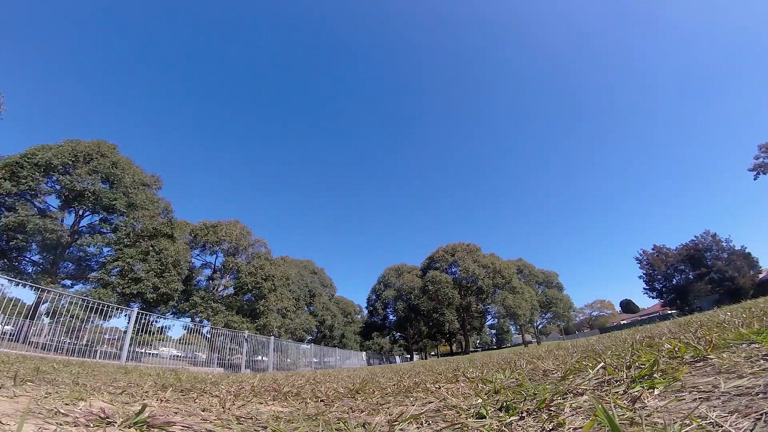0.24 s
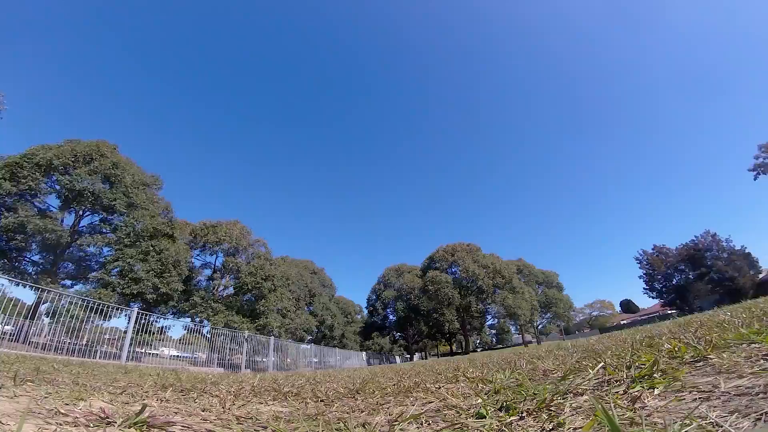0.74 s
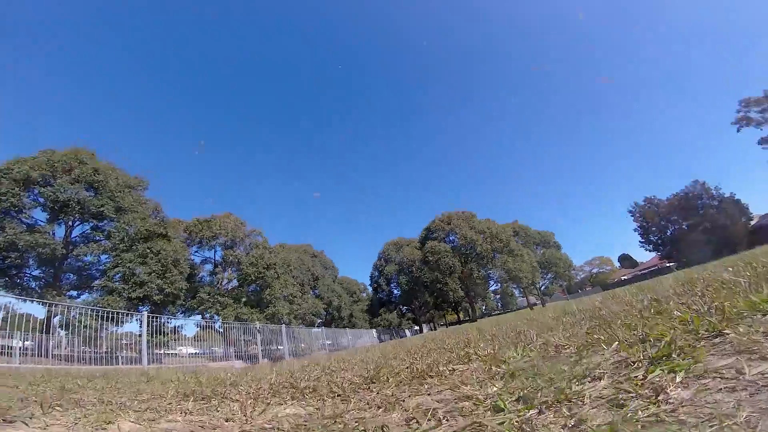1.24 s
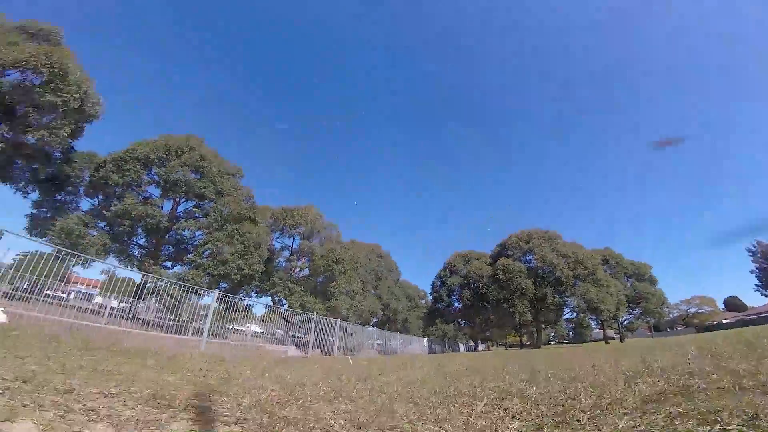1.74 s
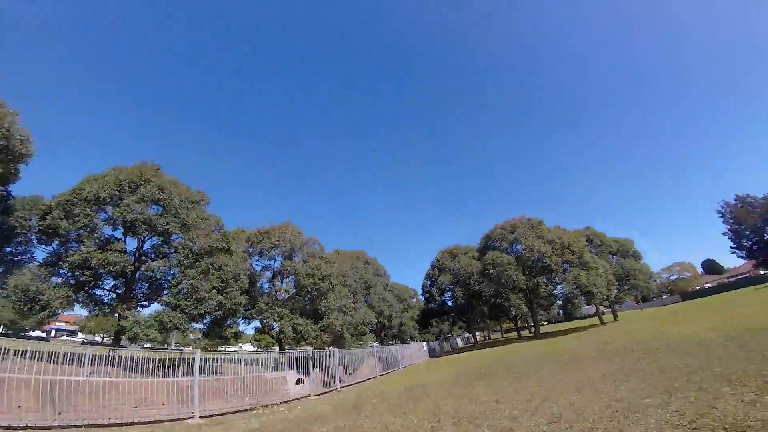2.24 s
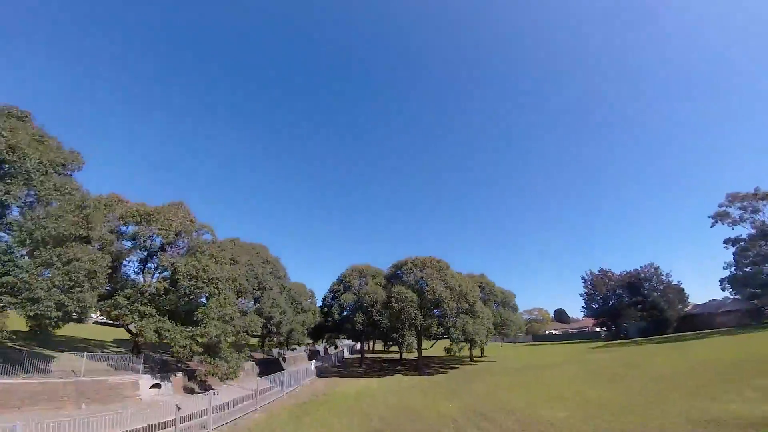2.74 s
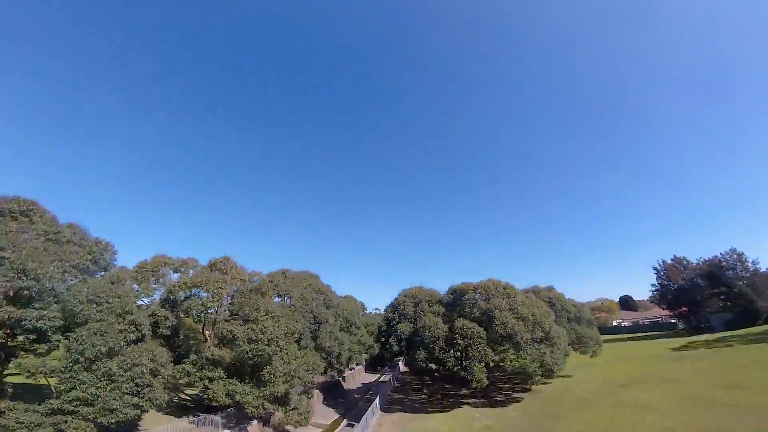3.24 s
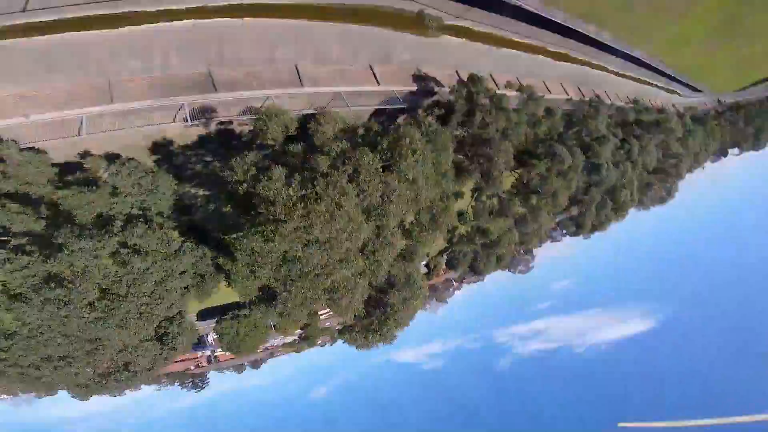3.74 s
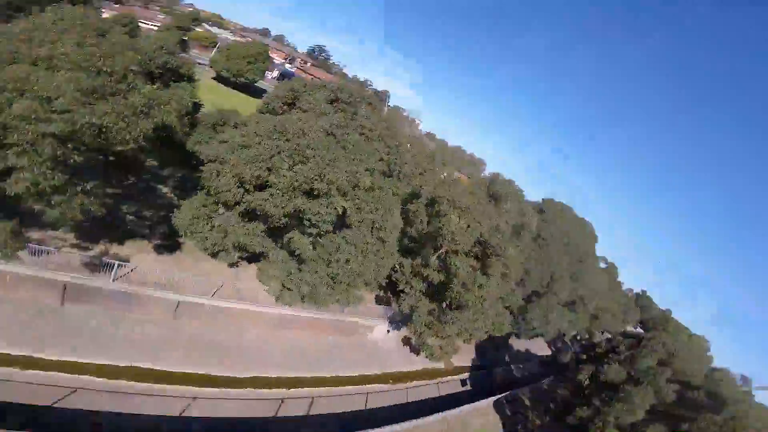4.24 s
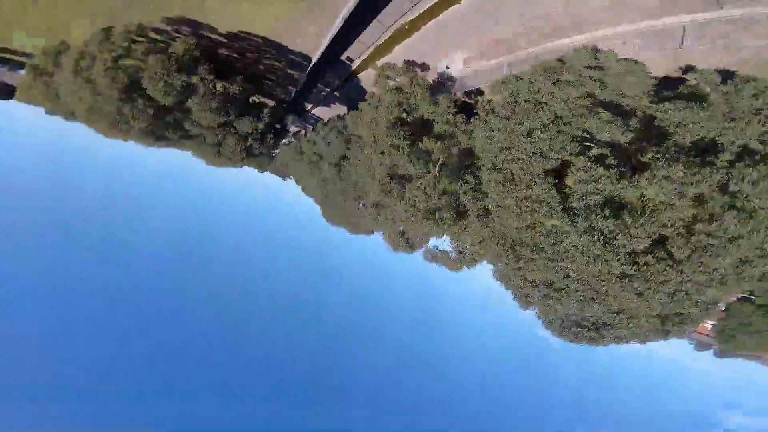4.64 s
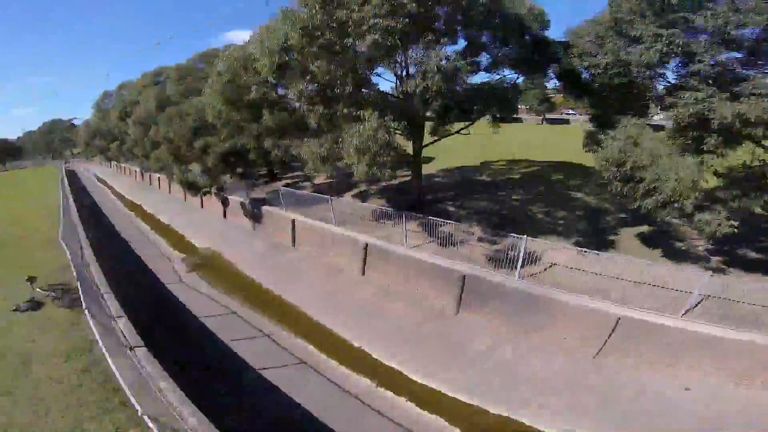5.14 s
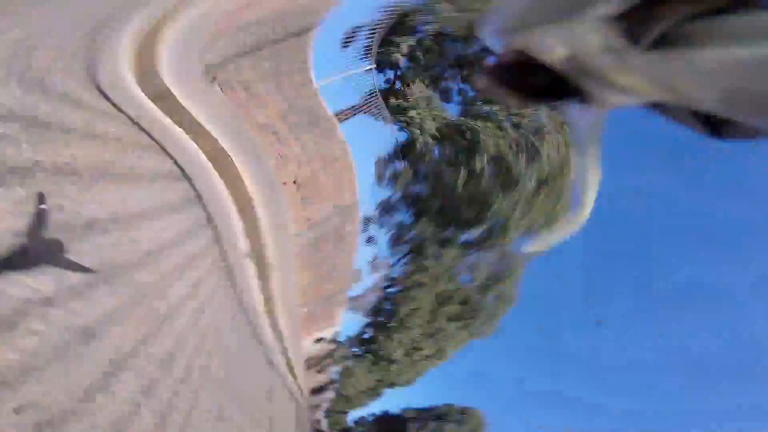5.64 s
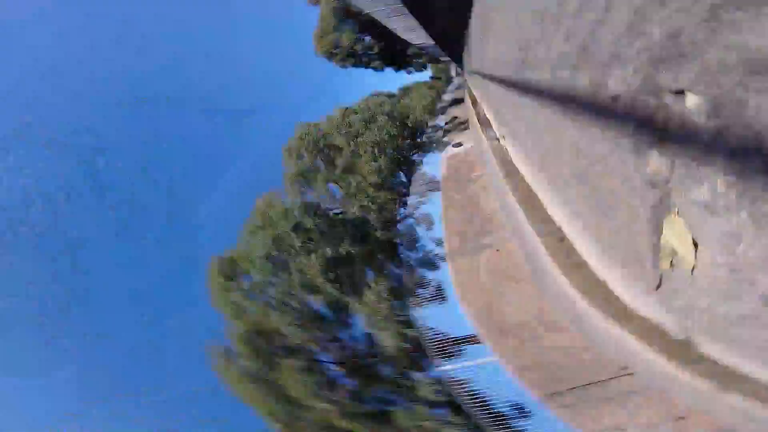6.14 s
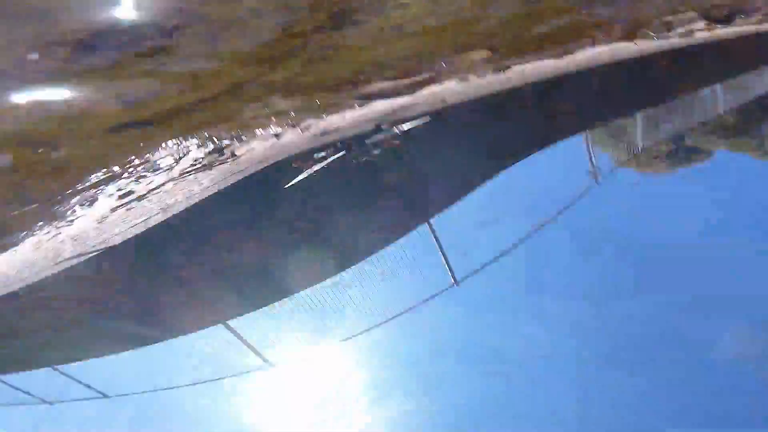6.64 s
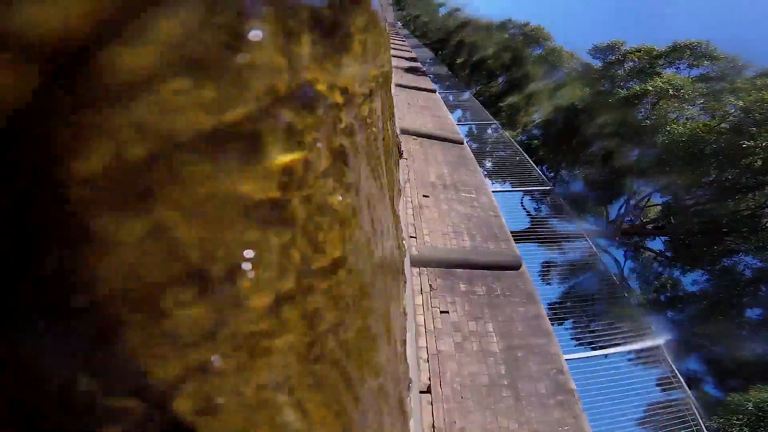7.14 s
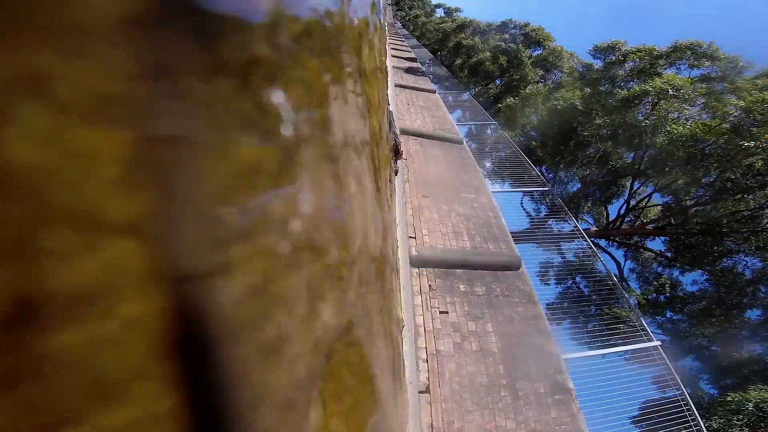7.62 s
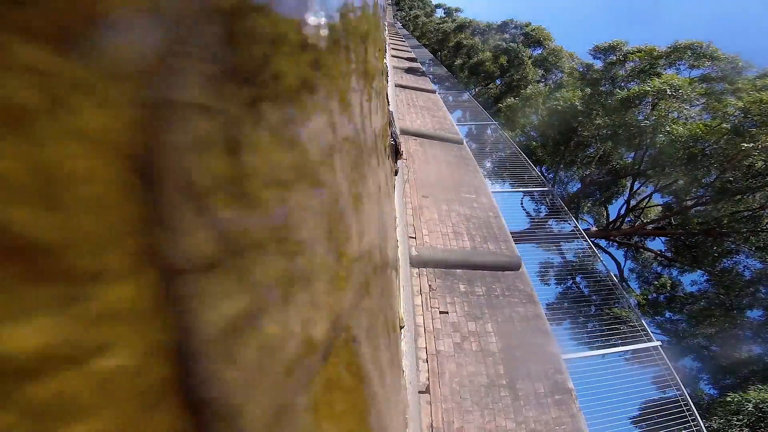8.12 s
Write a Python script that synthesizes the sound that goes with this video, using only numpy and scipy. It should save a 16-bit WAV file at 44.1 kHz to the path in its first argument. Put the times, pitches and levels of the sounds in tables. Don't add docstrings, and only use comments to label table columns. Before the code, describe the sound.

Heard from a microphone inside a camera housing on a small drone outdoors: uneven idling and gusty blade wash, then a loud climbing whine that slides and beats, with a harsh rattle. Motors cut, blades tick to a stop, faint birds chirp. Wind roars in the fall, then hard plastic knocks and scrapes on concrete, wet slaps, bubbles and drips.

```python
import sys
import numpy as np
from scipy import signal
from scipy.io import wavfile
from scipy.ndimage import uniform_filter1d

SR = 44100
rng = np.random.default_rng(int(sys.argv[2]) if len(sys.argv) > 2 else 0)


def bounce(signal):
    frames = np.transpose(np.atleast_2d(signal))
    limited = np.clip(frames, -1, 1)
    pcm = np.round(limited * 32767).astype(np.int16)
    wavfile.write(sys.argv[1], SR, pcm)


def makeup_ratio(level_db):
    decades = np.asarray(level_db, float) / 20
    return 10 ** decades


N = 369558


def evened(x):
    return x / np.sqrt(np.mean(x ** 2) + 1e-20)


def noise(size):
    return rng.standard_normal(size)


def add(mix, start_s, sound):
    part = mix[round(start_s * SR):][:len(sound)]
    part += sound[:len(part)]


def add_rows(mix, make, table, *settings):
    for row in table:
        add(mix, *make(*row, *settings))


def columns(rows):
    times_s, *rest = np.transpose(rows)
    t = np.arange(times_s[0], times_s[-1], 1 / SR)
    return times_s[0], [np.interp(t, times_s, column) for column in rest]


def wander(size, hz):
    lowpass = signal.butter(2, hz, fs=SR, output="sos")
    return evened(signal.sosfilt(lowpass, noise(size + 4000))[4000:])


def angle(hz):
    return 2 * np.pi * (np.cumsum(hz) / SR + rng.random())


def band(x, low_hz, high_hz):
    return signal.sosfilt(signal.butter(3, [low_hz, high_hz], "band", fs=SR, output="sos"), x)


def resonate(x, hz, width_hz):
    turn = np.exp(1j * angle(hz * np.ones(len(x))))
    r = np.exp(-np.pi * width_hz / SR)
    return 2 * (turn * signal.lfilter([1 - r], [1, -r], x / turn)).real


def faded(x, fade_s):
    return x * signal.windows.tukey(len(x), min(1, 2 * fade_s * SR / len(x)))


def capsule_hiss():
    return makeup_ratio(-84 + 3.5 * wander(N, 2.5)) * evened(band(noise(N), 5100, 7800))


CROSSOVER_HZ = [130, 900, 3600]
# pitch_hz, density_db [dB per Hz]
IDLE_COLOUR = [(20, -2), (208, 4), (631, 0), (954, -23), (2360, -36), (7350, -38), (12000, -72),
               (17000, -115)]
CLIMB_COLOUR = [(20, -20), (65, 4), (113, -11.5), (552, -13.5), (1410, -22.5), (6530, -29.5), (9390, -40.5),
                (11500, -73.5)]
FALL_COLOUR = [(20, 7.5), (81, -6.5), (246, -1), (881, -16.5), (2990, -31.5), (5400, -54.5), (6530, -47),
               (13000, -104)]
REST_COLOUR = [(20, -2.5), (54, 3.5), (358, -21), (1110, -47), (3750, -64.5), (6620, -45.5), (12000, -61),
               (17000, -99.5)]
# time_s, strength_db, bite_db [roar over wash]
WAKE = [(0.0, -49, -6), (0.034, -58, 2), (0.085, -51, -9), (0.087, -42, 7.5), (0.145, -52, -3)]
IDLE = [(0.145, -33, -0.5), (0.175, -39, 4), (0.19, -21.5, -18), (0.212, -26.5, -9.5), (0.228, -15, -15),
        (0.258, -15.5, -17), (0.275, -26.5, -9.5), (0.36, -30, -11.5), (0.44, -32, -9), (0.48, -23, -13),
        (0.56, -30, -10), (0.68, -26, -8.5), (0.922, -21.5, -11), (1.074, -28.5, -6.5),
        (1.114, -20.5, -6.5), (1.128, -28.5, 1.5), (1.135, -42.5, -3.5), (1.15, -41, 12)]
CLIMB = [(1.15, -28, -18), (1.194, -23.5, -13.5), (1.66, -22.5, -12), (2.036, -33, 7.5), (2.12, -31, 8.5),
         (2.606, -35.5, 8), (2.886, -37.5, 3), (3.404, -37.5, 10.5), (3.42, -46.5, -1)]
COAST = [(3.42, -28.5, -1), (3.442, -35, 1), (3.47, -39.5, -5), (3.69, -35, -7.5), (3.712, -28, -2),
         (3.745, -26.5, -4.5), (3.8, -46, -23), (4.02, -60.5, -5.5), (4.22, -48.5, -11.5),
         (4.69, -43, -18.5), (4.715, -30.5, -27), (4.78, -36, -22.5)]
DIVE = [(4.77, -36, -21), (4.80, -32, -7.5), (4.842, -34.5, 7.5), (4.852, -35.5, -25), (4.888, -34.5, -18),
        (4.9, -30, -14), (4.93, -26.5, -25), (5.0, -30.5, -23), (5.038, -33, -24), (5.048, -21, -36.5),
        (5.09, -17.5, -19.5), (5.125, -19, -25), (5.154, -15.5, -11.5), (5.255, -20.5, -10.5),
        (5.29, -19.5, -20), (5.35, -27, -4.5), (5.53, -27.5, -0.5), (5.643, -21.5, -20)]
REST = [(5.64, -65.5, -3), (5.82, -52.5, -17.5), (6.62, -72.5, 1), (6.92, -67, -4), (7.13, -52.5, -18),
        (7.3, -62, -5.5), (8.38, -56, -6)]
# time_s, strength_db, bite_db
RUSH = [
    (5.15, -80.5, 0.0045),
    (5.53, -48, 0),
    (5.643, -74, 0.0068),
]


def air(rows, colour, buffet_db, hiss_db, hiss_bite, gust_db, patchy_db):
    start_s, (wash, bite) = columns(rows)
    buffet = buffet_db + 0.49 * wash - 0.43 * bite
    levels_db = [buffet, wash, wash + bite, hiss_db + wash + hiss_bite * bite]
    size = len(wash)
    hz = np.fft.rfftfreq(1024, 1 / SR)
    real, imag, patches = rng.standard_normal((size // 256 + 6, 513, 3)).T
    patches = uniform_filter1d(patches, size=10, axis=0)
    patches = evened(uniform_filter1d(patches, size=6, axis=1))
    colour_hz, colour_db = np.transpose(colour)
    tilt_db = np.interp(np.log(hz + 1), np.log(colour_hz), colour_db, right=-120)
    spectrum = (real + 1j * imag) * makeup_ratio(tilt_db[:, None] + patchy_db * patches)
    above = [1 / (1 + (c / (hz + 1)) ** 8) for c in CROSSOVER_HZ]
    above = [np.ones(513)] + above + [np.zeros(513)]
    gusts = wander(size, 50)
    gusts = makeup_ratio(gust_db * evened(gusts - uniform_filter1d(gusts, size=5000)))
    out = np.zeros(size)
    for k, level_db in enumerate(levels_db):
        share = np.sqrt(np.maximum(above[k] - above[k + 1], 0))[:, None]
        layer = signal.istft(spectrum * share, nperseg=1024, noverlap=768)[1][:size]
        out += makeup_ratio(uniform_filter1d(level_db, size=250)) * evened(gusts * layer)
    return start_s, faded(out, 0.0018)


# start_s, length_s, pitch_hz, width_hz, level_db
WHISTLES = [(.15, .98, 7300, 110, -55), (2.75, .6, 6200, 1400, -42), (1.17, .8, 9800, 1300, -58),
            (1.9, .8, 2600, 900, -38), (3.42, .37, 2300, 1600, -47), (1.3, .5, 1820, 200, -42),
            (.093, .07, 6020, 40, -47), (1.17, 1.1, 6500, 400, -46), (1.17, .9, 4900, 400, -47),
            (5.92, .2, 6900, 900, -78), (4.45, .6, 6600, 600, -84), (4.65, .4, 6600, 600, -80),
            (5.08, .03, 4000, 2000, -54), (5.15, .25, 3800, 2500, -51), (2.15, .45, 390, 110, -29),
            (.984, .016, 620, 250, -21), (6.62, .08, 1700, 500, -66), (5.4, .2, 2700, 700, -38),
            (8.05, .33, 6600, 900, -82), (1.17, .6, 11300, 700, -66), (7.39, .035, 2100, 350, -62),
            (3.43, .02, 520, 120, -28), (7.05, .13, 2300, 1100, -63), (7.18, .3, 1900, 1400, -69),
            (6.99, .03, 1400, 1500, -39), (7.02, .045, 1700, 1300, -53), (6.745, .08, 850, 150, -62)]


def whistle(start_s, length_s, hz, width_hz, level_db):
    size = round(length_s * SR)
    sound = noise(size) * makeup_ratio(3 * wander(size, 30))
    for width in (width_hz, width_hz, 2 * width_hz):
        sound = resonate(sound, hz, width)
    return start_s, faded(makeup_ratio(level_db) * evened(sound), 0.0033)


# start_s, length_s, pops_per_s, level_db
CRACKLE = [(7.47, 0.24, 840, -63.5)]


def crackle(start_s, length_s, pops_per_s, level_db):
    chance, size = rng.random((round(length_s * SR), 2)).T
    pops = (chance < pops_per_s / SR) * makeup_ratio(24.0 * size ** 2)
    return start_s, makeup_ratio(level_db) * evened(band(pops, 900, 4200))


# start_s, length_s, from_hz, to_hz, level_db
CHIRPS = [
    (4.02, .035, 2700, 3850, -63),
    (4.135, .04, 2700, 3350, -62),
    (4.235, .045, 2300, 3250, -61),
    (4.355, .04, 2200, 3200, -58),
    (4.465, .04, 2400, 3100, -62),
    (4.833, 0.0086, 895, 960, -13),
    (1.19, .1, 1150, 1380, -32),
    (6.978, 0.091, 59.4, 36.3, -13),
    (6.995, .07, 150, 105, -24),
]


def chirp(start_s, length_s, from_hz, to_hz, level_db):
    u = np.arange(round(length_s * SR)) / (length_s * SR)
    hz = from_hz + (to_hz - from_hz) * np.sin(1.6 * u)
    return start_s, makeup_ratio(level_db) * np.sin(np.pi * u * np.sqrt(u)) * np.sin(angle(hz))


# start_s, length_s, pitch_hz, level_db
WARBLE = [(.32, .8, 2450, -49), (.65, .47, 3250, -48)]


def warble(start_s, length_s, hz, level_db):
    size = round(length_s * SR)
    wobble = .07 * np.sin(angle(28 + 4. * wander(size, 8)))
    tone = np.sin(angle(hz * (1 + wobble)))
    return start_s, faded(makeup_ratio(level_db + 2.5 * wander(size, 25)) * tone, 0.019)


# start_s, peak_db, pitch_hz
TICKS = [(3.6172, -48, 2400), (3.6473, -32, 2170), (3.6644, -32, 1800), (3.683, -36, 2000),
         (3.709, -33, 1810), (3.721, -42, 2400), (3.7354, -38, 1600), (3.7547, -43, 2380),
         (3.7774, -46, 2220), (3.7894, -45, 1990)]
DRIPS = [(6.9174, -38, 1610), (6.9805, -29, 1400), (7.0394, -37, 1840), (7.0474, -34, 1590),
         (7.0794, -40, 1200), (7.1114, -44, 1560), (7.1224, -44, 929), (7.2514, -49, 897),
         (7.4315, -37.5, 1876), (7.4799, -41, 2010), (7.4939, -33, 1790), (7.5073, -28.5, 1750),
         (7.5194, -35, 1480), (7.5492, -34, 1350), (7.5712, -43, 1300), (7.5926, -48, 1210),
         (7.6136, -35, 1210), (7.6214, -38, 1380), (7.6304, -40, 1095), (7.6434, -48, 1340),
         (7.6655, -37, 1470), (7.6774, -37, 1560), (7.687, -13, 3000), (7.7472, -18, 4200),
         (6.472, -50, 900), (6.848, -47, 2180)]


def tick(start_s, peak_db, hz, decay_s):
    t = np.arange(900) / SR
    snap = band(noise(len(t)) * np.exp(-t / decay_s), .12 * hz, 1.7 * hz)
    return start_s, makeup_ratio(peak_db) * snap / np.abs(snap).max()


# start_s, peak_db, pitch_hz
PINGS = [(2.1402, -28, 5590), (2.1572, -22.5, 5460), (2.1881, -25, 6200), (2.2186, -27, 5700),
         (2.234, -21, 5130), (2.253, -23, 5500), (2.301, -24, 5730), (2.3158, -19.5, 5400),
         (2.3922, -25, 5240), (2.4241, -21.5, 5500), (2.4934, -24, 5310), (2.5827, -24, 5260),
         (2.597, -28, 5100), (2.2111, -13.5, 1560), (2.2645, -10.5, 2700), (2.2665, -11, 1850),
         (2.3667, -13.5, 1810), (2.4316, -17.5, 2300), (3.3141, -37, 8400)]
BUBBLES = [(6.991, -19.5, 484), (6.996, -27, 1880), (7.008, -30, 1053), (7.033, -27.5, 1800),
           (7.15, -50, 520)]


def ping(start_s, peak_db, hz, ring_s):
    t = np.arange(2600) / SR
    u = t / ring_s * np.sqrt(hz / 1000)
    rough = np.sin(angle(hz * (1 + .05 * wander(len(t), 250))))
    rough = rough + .5 * np.sin(angle(1.13 * hz + 0 * t))
    return start_s, makeup_ratio(peak_db) * u * np.exp(1 - u) * rough / 1.1


# start_s, length_s, rumble_db, rasp_db, rasp_hz
SCRAPES = [(5.701, 0.044, -11, -39.5, 4970), (5.89, 0.031, -20, -50, 3000), (6.227, 0.041, -21, -43, 5900),
           (6.301, 0.053, -34, -48, 4460), (6.516, 0.091, -78, -60.5, 3970),
           (6.562, 0.046, -58, -48.5, 3210), (6.584, 0.049, -57, -44.5, 3040),
           (6.603, 0.13, -46.5, -72, 1500), (6.732, 0.066, -72, -46, 2710), (6.851, 0.17, -52, -57.5, 2530),
           (6.947, 0.028, -26, -47, 2320), (6.986, 0.054, -27, -55, 1900), (7.194, 0.021, -35, -68, 1500)]


def scrape(start_s, length_s, rumble_db, rasp_db, rasp_hz):
    size = round(1.3 * length_s * SR)
    grit = noise(size) * makeup_ratio(3.6 * wander(size, 150))
    port = (rasp_hz / 5500) ** 2 * resonate(grit, 7200, 800)
    rasp = evened(band(grit, 0.42 * rasp_hz, 1.38 * rasp_hz) + port)
    rumble = wander(size, 190)
    sound = makeup_ratio(rumble_db) * rumble + makeup_ratio(rasp_db) * rasp
    return start_s, faded(sound * np.geomspace(1.9, .07, size), 0.003)


# start_s, crack_db, thump_hz, thump_db, knock_db
BUMPS = [(0.0914, -14.5, 54, -18.5, -50), (0.1452, -20, 80.7, -50, -30), (0.1876, -22, 330, -17.5, -49),
         (0.225, -27, 180, -8.5, -31), (4.272, -68, 220, -41, -51), (4.333, -68, 258, -40.5, -38),
         (5.0927, -50, 150, -8.5, -26), (4.9032, -52, 420, -18, -33), (5.031, -39, 96, -17, -47),
         (3.915, -74, 79, -31.5, -64)]
BOUNCES = [(5.7038, 1, 94.2, -8.5, 4.5), (5.7261, -21.5, 79.5, -14, -34), (5.766, -35, 93, -20.5, -41),
           (5.7988, -41.5, 250, -34.5, -35.5), (5.896, -38, 80, -25.5, -29),
           (5.9043, -53, 110.2, -9.5, -50), (6.2445, -41, 167.7, -14.5, -47),
           (6.2514, -20.5, 89.5, -5.5, -27), (6.3012, -44, 215, -17, -45), (6.343, -40, 81, -51, -38),
           (6.412, -31, 123, -13.5, -19.5), (6.4255, -34.5, 485, -7.5, -24), (6.4388, -38, 77, -25.5, -38)]
SLAPS = [(6.7355, -18.5, 170, -3.5, -5.5), (6.865, -26, 142, -4.5, -3.5), (6.8319, -42, 79.5, -31, -37),
         (6.9056, -35, 80.7, -28, -31), (6.9535, -39, 154, -15, -23), (6.9586, -39, 450, -19, -12.5),
         (6.995, -49, 78, -10.5, -12.5), (7.032, -50, 199, -45, -32), (7.047, -51, 79, -36, -48),
         (7.1024, -48, 104, -33.5, -41), (7.204, -47, 80, -24, -55), (7.6873, -36, 240, -16.5, -6.5)]
STOPS = [(6.119, -29, 78.3, -16, -23), (6.323, -19, 97, -7.5, -20.5), (7.307, -60.5, 79, -23.5, -31.5)]
DAMPING = [1.5, 1.53, 1.94, 5]


def blow(start_s, crack_db, thump_hz, thump_db, knock_db, damping_per_cycle):
    t = np.arange(2600) / SR
    swing = np.sin(2 * np.pi * thump_hz * t / (1 + 25 * t) + 1.0)
    push = swing * np.exp(-damping_per_cycle * thump_hz * t) * (1 - np.exp(-t / 0.0003))
    knock = band(noise(len(t)) * np.exp(-t / 0.00076), 480, 1940)
    crack_decay = np.exp(-t / 0.0016) + 0.071 * np.exp(-t / 0.0026)
    crack = band(noise(len(t)) * crack_decay, 1700, 6500)
    crack = crack + 9.5 * resonate(crack, 6600, 610)
    parts = ((thump_db + 4.0, push), (knock_db, knock), (crack_db - 4.5, crack))
    return start_s, sum(makeup_ratio(peak_db) * p / np.abs(p).max() for peak_db, p in parts)


# time_s, pitch_hz, level_db
SWAY = [(1.18, 73, -35.5), (1.294, 82.9, -30), (1.784, 70.5, -37.5), (2.162, 69.8, -31.5),
        (2.72, 57.8, -34)]


def sway():
    start_s, (hz, level_db) = columns(SWAY)
    unsteady = makeup_ratio(level_db + 4.9 * wander(len(hz), 16))
    return start_s, faded(np.sqrt(2) * unsteady * np.sin(angle(hz)), 0.017)


# time_s, mean_hz, level_db
SHAFTS = [
    [(1.17, 210.6, -4), (1.242, 229.6, -14), (1.4, 194, -20.5)],
    [(1.45, 143.4, -30), (1.63, 201.9, -14.5), (1.796, 218.1, -12.5), (2.07, 178, -23),
     (2.18, 263.6, -15.5), (2.242, 243.8, -19), (2.56, 231.6, -18.5), (2.71, 198.3, -24.5)],
    [(2.73, 213.8, -18), (2.858, 245.9, -26), (3.062, 253.6, -23), (3.36, 221.8, -24.5), (3.45, 215.2, -30)],
]


def shafts(rows, spread_hz):
    start_s, (hz, level_db) = columns(rows)
    tone = 0
    turns = []
    for offset, gain_db in ((-0.35, 4.8), (0.6, 5.5), (0.17, 5.2)):
        a = angle(hz + offset * spread_hz + 3.7 * wander(len(hz), 11.0))
        turns.append(a)
        orders = np.sin(a) + .25 * np.sin(2 * a) + .14 * np.sin(3 * a) + .07 * np.sin(6 * a)
        tone = tone + makeup_ratio(gain_db) * orders
    swell = makeup_ratio(2.5 * np.sin(2.3 * turns[0] / 20))
    return start_s, faded(makeup_ratio(level_db) * evened(tone * swell), 0.055)


# time_s, shaft_hz, level_db, ring_hz, width_hz
RATTLE = [
    [(2.737, 285, -34.5, 2570, 110), (2.748, 284.3, -5, 2500, 110), (2.768, 272, -17, 2440, 130),
     (2.79, 286, -13, 2550, 110), (2.822, 288, -11, 2660, 110), (2.852, 255, -18.5, 2400, 150)],
    [(2.846, 261, -24, 2320, 148), (2.875, 261, -12, 2400, 258), (2.91, 271.4, -17, 2400, 120),
     (2.942, 262, -16.5, 2370, 160), (2.978, 265, -9.5, 2360, 333), (3.008, 266, -19.5, 2360, 197),
     (3.07, 261, -15.5, 2350, 220), (3.09, 262, -15.5, 2310, 180)],
    [(3.084, 255.3, -16.5, 2310, 180), (3.11, 251.8, -15, 2340, 230), (3.138, 248, -17.5, 2260, 168),
     (3.166, 253.4, -12, 2210, 272), (3.186, 239, -23, 2230, 200), (3.212, 239.7, -11.5, 2090, 200),
     (3.244, 219.3, -14.5, 1950, 200)],
    [(3.236, 246, -12, 1830, 201), (3.256, 242.6, -18.5, 1840, 200), (3.292, 242, -12, 1847, 201),
     (3.302, 233.6, -23, 1820, 200), (3.32, 238, -11.5, 1770, 200), (3.348, 228.5, -26.5, 1760, 200)],
    [(3.358, 256.3, -36, 1950, 201), (3.372, 239.2, -7.5, 1920, 200), (3.386, 231.5, -26.5, 1840, 200),
     (3.4, 232, -12.5, 1860, 200), (3.415, 228.6, -66, 1830, 200)],
]


def rattle(rows):
    start_s, (hz, level_db, ring_hz, width_hz) = columns(rows)
    size = len(hz)
    turn = angle(hz * (1 + 0.004 * wander(size, 56)))
    reach = []
    for k in range(4, 14):
        peak = np.exp(-((k * hz - ring_hz) / width_hz) ** 2)
        skirt = np.exp(-((k * hz - ring_hz + 150) / 750) ** 2)
        reach.append(peak + 0.2 * skirt)
    reach = reach / np.linalg.norm(reach, axis=0)
    strikes = evened(sum(g * np.cos(k * turn + .04 * k * k) for k, g in enumerate(reach, start=4)))
    buzz = evened(resonate(resonate(noise(size), ring_hz, 640), ring_hz, 300))
    third = np.cos(27 * turn) * np.clip((hz - 235) / 20, 0, 1) * np.clip((275 - hz) / 10, 0, 1)
    high = sum(makeup_ratio(3 * wander(size, 40)) * np.cos(k * turn + k * k) for k in range(18, 22))
    high = high + evened(band(noise(size), 4500, 5900))
    high_gain = makeup_ratio(.3 * level_db - 34) * np.clip((ring_hz - 1900) / 400, .25, 1)
    high = high_gain * (high + .7 * third)
    overtones = makeup_ratio(-19) * (hz < 254) * np.cos(1.6 * turn) + makeup_ratio(-24) * np.cos(2 * turn)
    flutter_db = 1.3 * wander(size, 32)
    sound = makeup_ratio(level_db + flutter_db) * (strikes + .42 * buzz + overtones) + high
    return start_s, faded(sound, 0.005)


# time_s, pitch_hz, level_db
ROTOR_A = [(1.22, 263, -21), (1.3, 509, -17.5), (1.34, 565, -18), (1.362, 564, -16.5), (1.394, 562, -14.5),
           (1.422, 517.4, -15.5), (1.54, 371, -21), (1.68, 222.6, -30)]
ROTOR_B = [(1.22, 255, -27), (1.36, 338, -24), (1.538, 490, -22), (1.62, 595, -18), (1.746, 628, -22.5),
           (1.86, 608, -23), (1.93, 550, -27), (1.978, 520, -35), (2.11, 480, -36), (2.14, 500, -21),
           (2.258, 640, -24.5), (2.37, 676, -22), (2.55, 664, -21), (2.635, 545, -21), (2.69, 565, -22),
           (2.73, 720, -27)]
ROTOR_C = [(1.72, 225.6, -35), (1.876, 512.5, -16), (2.012, 602, -16.5), (2.084, 564.5, -13.5),
           (2.15, 390, -24)]
ROTOR_D = [(2.715, 707, -35), (2.74, 742, -19.5), (2.764, 629, -28), (2.812, 748, -25), (2.858, 774.4, -25),
           (3.096, 760, -24.5), (3.28, 719, -31), (3.4, 664, -30), (3.42, 630, -34.5)]
ROTOR_E = [(2.13, 600, -36), (2.18, 735, -27), (2.23, 770, -27), (2.3, 640, -33), (2.42, 590, -29),
           (2.55, 560, -30), (2.68, 480, -36)]
# pitch_hz, width_hz, pole_order [of the blade rate]
BELL = (7860, 260, 14)


def blade_overtones(a):
    return np.sin(2 * a) + .45 * np.sin(3 * a) + .15 * np.sin(4 * a)


def rotor(rows, fine_db, octave_db, bell_db, near_db):
    start_s, (hz, level_db) = columns(rows)
    size = len(hz)
    turn = angle(hz * (1 + .007 * wander(size, 40)))
    bell_hz, width_hz, order = BELL
    bell = makeup_ratio(bell_db) * np.exp(-((order * hz - bell_hz) / width_hz) ** 2)
    bell = bell * (1 + 0.7 * np.cos(turn / 3))
    tone = np.sin(turn) + makeup_ratio(octave_db) * blade_overtones(turn) + bell * np.sin(order * turn)
    fine = sum((4 / k) ** 1.5 * np.sin(k * turn / 3 + k * k) for k in range(4, 14) if k % 3)
    tone += makeup_ratio(fine_db + 1.9 * wander(size, 25)) * fine
    near = angle(hz * (1.05 + 0.044 * wander(size, 4.6)))
    neighbour = np.sin(near) + makeup_ratio(octave_db) * blade_overtones(near)
    tone += makeup_ratio(near_db + 4.0 * wander(size, 4.6)) * neighbour
    return start_s, faded(np.sqrt(2) * makeup_ratio(level_db + 0.99 * wander(size, 21)) * tone, 0.021)


def scene():
    mix = capsule_hiss()
    for rows, colour, buffet_db, hiss_db, hiss_bite, gust_db, patchy_db in (
            (WAKE, IDLE_COLOUR, -7.5, -11.5, 0.3, -1.0, 3.0),
            (IDLE, IDLE_COLOUR, -29.5, -10, 1.33, 1.7, 1.2),
            (CLIMB, CLIMB_COLOUR, -22.5, -8.0, 0.05, 1.5, 2.0),
            (COAST, FALL_COLOUR, -26, -10.0, 6.2, 1.5, 1.5),
            (DIVE, FALL_COLOUR, -17.0, -32.5, 0.58, 2.5, 1.5),
            (RUSH, FALL_COLOUR, 6.5, 22.5, 0, 2.0, 1.2),
            (REST, REST_COLOUR, -22.5, -20.0, 3.6, -0.5, 3.0)):
        add(mix, *air(rows, colour, buffet_db, hiss_db, hiss_bite, gust_db, patchy_db))
    add_rows(mix, whistle, WHISTLES)
    add_rows(mix, crackle, CRACKLE)
    add_rows(mix, chirp, CHIRPS)
    add_rows(mix, warble, WARBLE)
    add_rows(mix, tick, TICKS, .003)
    add_rows(mix, tick, DRIPS, .0006)
    add_rows(mix, ping, PINGS, .0028)
    add_rows(mix, ping, BUBBLES, .0055)
    add_rows(mix, scrape, SCRAPES)
    for table, damping_per_cycle in zip((BUMPS, BOUNCES, SLAPS, STOPS), DAMPING):
        add_rows(mix, blow, table, damping_per_cycle)
    add(mix, *sway())
    for rows, spread_hz in zip(SHAFTS, (15, 38, 26)):
        add(mix, *shafts(rows, spread_hz))
    for rows in RATTLE:
        add(mix, *rattle(rows))
    add(mix, *rotor(ROTOR_A, fine_db=-37, octave_db=-46.5, bell_db=-11, near_db=-20))
    add(mix, *rotor(ROTOR_B, fine_db=-19, octave_db=-10, bell_db=-45, near_db=-8))
    add(mix, *rotor(ROTOR_C, fine_db=-27, octave_db=-22, bell_db=-26, near_db=-12))
    add(mix, *rotor(ROTOR_D, fine_db=-24, octave_db=-7, bell_db=-45, near_db=-24))
    add(mix, *rotor(ROTOR_E, fine_db=-13, octave_db=-10, bell_db=-45, near_db=-8))
    return mix[None]


def top_cut(x):
    return signal.sosfilt(signal.butter(12, 15610, fs=SR, output="sos"), x)


def record(dry):
    thin = 0.77 * signal.sosfilt(signal.butter(2, 24, "high", fs=SR, output="sos"), dry)
    firm = thin / (1. + (thin / 0.67) ** 12) ** (1 / 12)
    dull = signal.sosfilt(signal.butter(4, 11000, fs=SR, output="sos"), firm)
    return top_cut(dull)


dry = scene()
out = record(dry)
bounce(out)
```